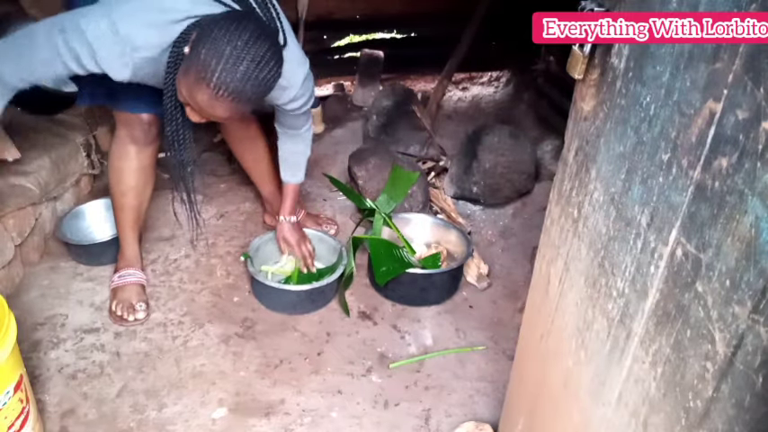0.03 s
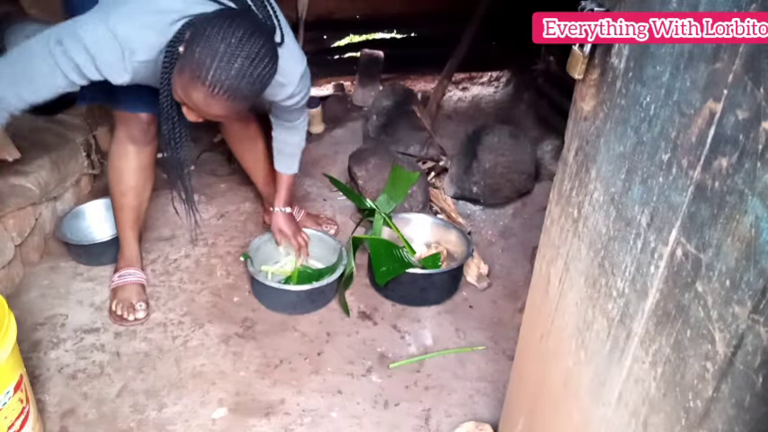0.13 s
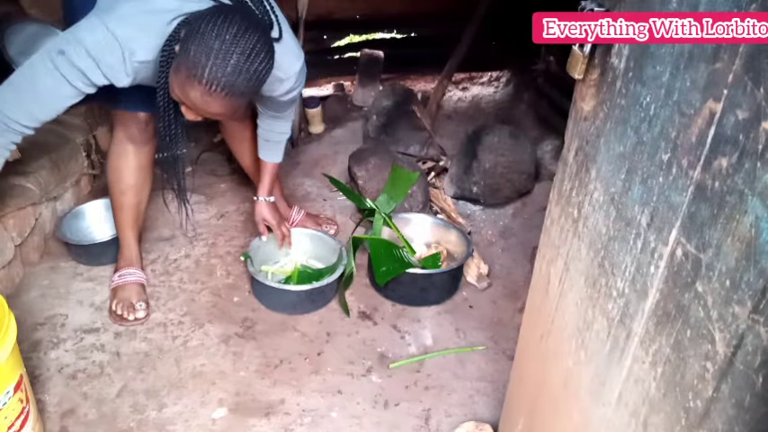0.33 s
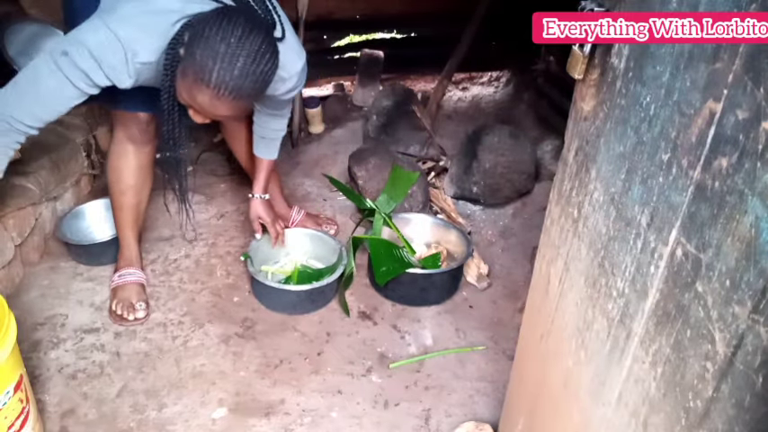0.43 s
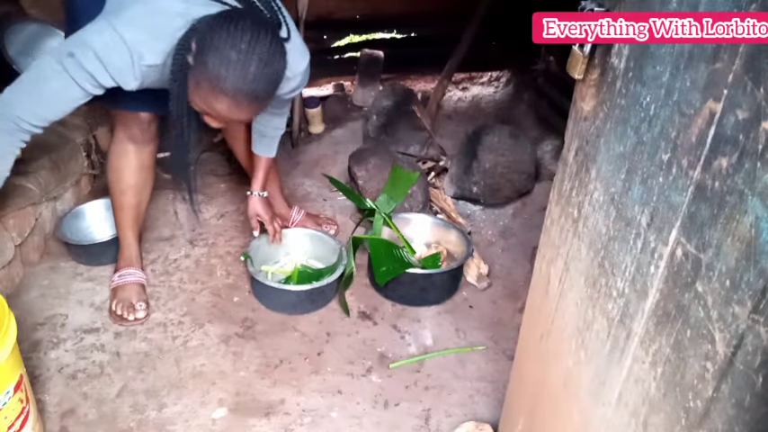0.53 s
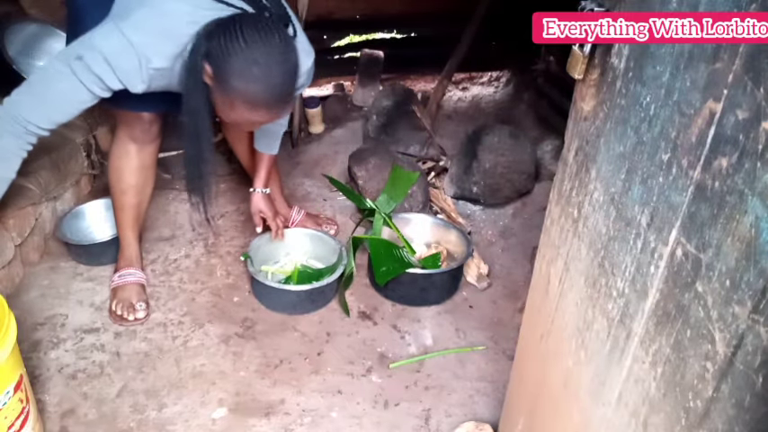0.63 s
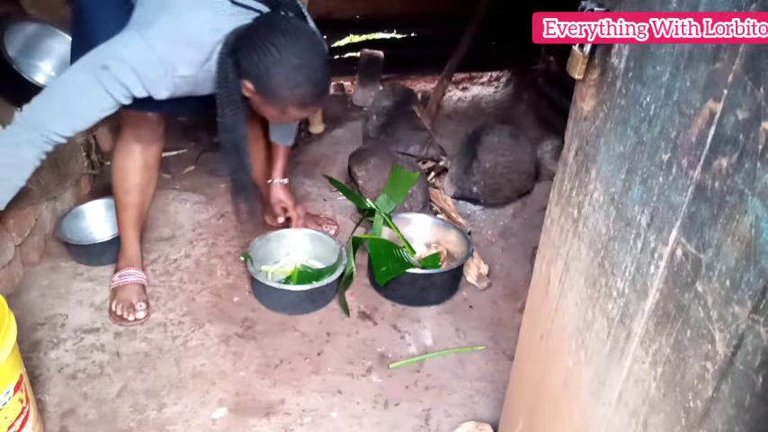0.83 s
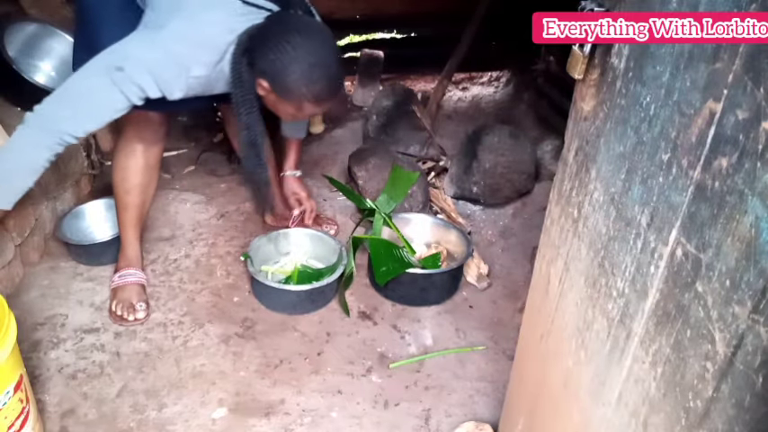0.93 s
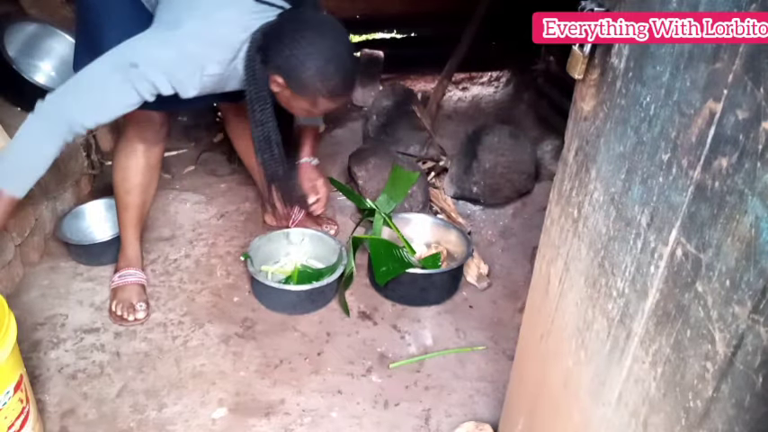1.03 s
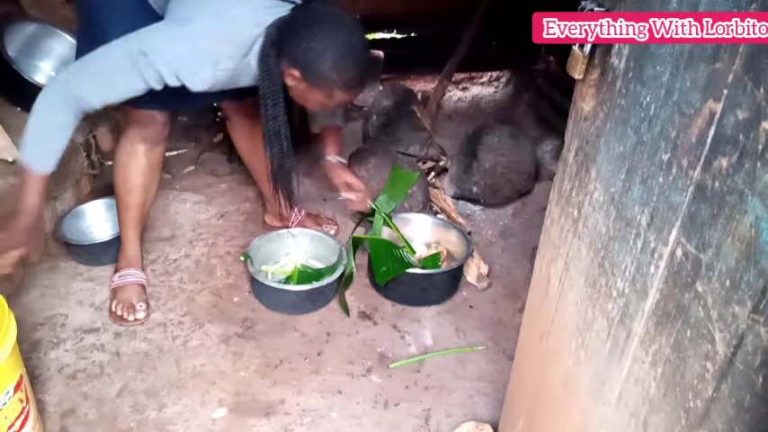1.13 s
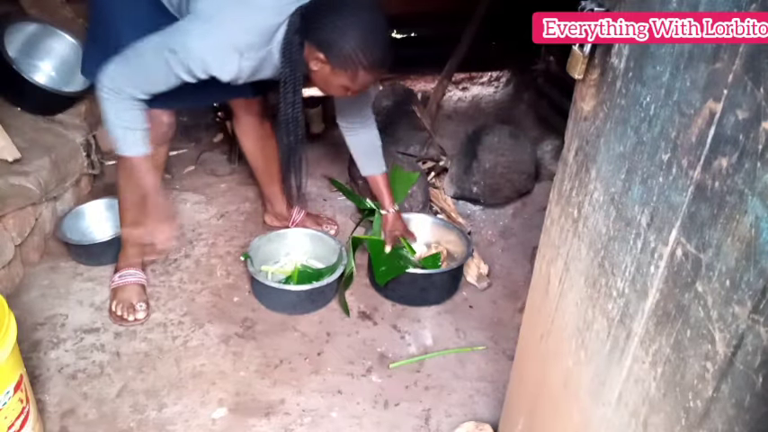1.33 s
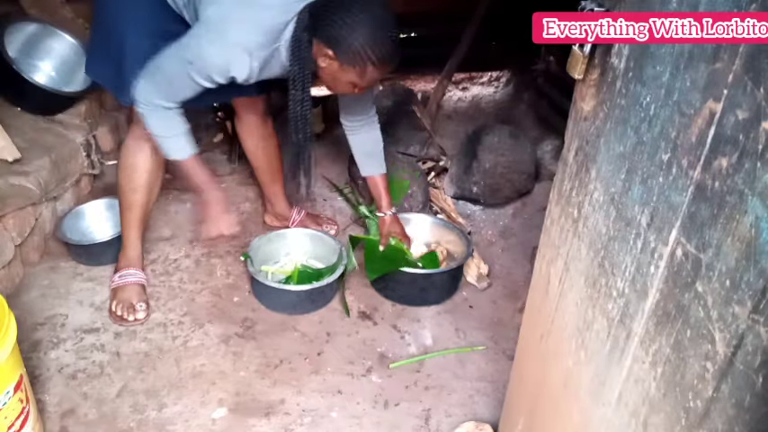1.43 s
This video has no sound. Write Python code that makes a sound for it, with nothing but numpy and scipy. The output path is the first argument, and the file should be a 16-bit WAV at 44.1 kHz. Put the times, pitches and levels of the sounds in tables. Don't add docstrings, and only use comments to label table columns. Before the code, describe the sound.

Hollow pot knocks on an earth floor, with faint scraping, then fresh leaves crackle and snap

```python
import sys
import numpy as np
from scipy import signal
from scipy.fft import rfft, irfft
from scipy.io import wavfile
from scipy.ndimage import uniform_filter1d, map_coordinates

SR = 44100
rng = np.random.default_rng(int(sys.argv[2]) if len(sys.argv) > 2 else 0)


def to_linear_factor(level_db):
    exponent = np.asarray(level_db, float) / 20
    return 10 ** exponent


def generate_wav(signal):
    frames = np.transpose(np.atleast_2d(signal))
    scaled = np.clip(frames, -1, 1) * 32767
    pcm = np.round(scaled).astype(np.int16)
    wavfile.write(sys.argv[1], SR, pcm)


N = 66150
T = np.arange(N) / SR


def unit(x):
    return x / np.sqrt(np.mean(x ** 2))


def noise(n=N):
    return rng.standard_normal(n)


def curve(rows):
    rows = np.array(rows, float)
    return to_linear_factor(np.interp(T, rows[:, 0], rows[:, 1]))


def colour(x, points):
    p = np.array(points, float)
    f = np.fft.rfftfreq(len(x), 1 / SR)
    gain = to_linear_factor(np.interp(np.log(f + 1), np.log(p[:, 0]), p[:, 1]))
    return irfft(rfft(x) * gain, len(x))


def band(x, hz, width_hz):
    return signal.lfilter(*signal.iirpeak(min(hz, .45 * SR), max(hz / width_hz, .3), SR), x)


def band_twice(x, hz, width_hz):
    return band(band(x, hz, width_hz), hz, width_hz)


def walk(rate_hz):
    k = int(SR / rate_hz)
    steps = np.repeat(noise(N // k + 1), k)
    return 2.1 * uniform_filter1d(uniform_filter1d(steps, k), k)[:N]


def fade(s, tau_s):
    return (T >= s) * np.exp(-np.maximum(T - s, 0) / tau_s)


def hollow_ring(modes, t):
    longest_t60_s, swell_s, swell_below_hz = .17, .011, 850
    wobble_db, wobble_rad = 2.5, .55
    ring = 0
    for k, (hz, db, t60) in enumerate(modes):
        level = to_linear_factor(db - 60 * t / min(t60, longest_t60_s) + wobble_db * walk(75.54)[:len(t)])
        tone = np.sin(2 * np.pi * hz * t + wobble_rad * walk(63)[:len(t)])
        swell = 1 - np.exp(-t / swell_s * max(hz / swell_below_hz, 1) ** 4)
        ring = ring + (-1) ** k * level * tone * swell
    return ring


def knocks():
    # t/s, body level/dB, crack over body/dB, contact cut-off f/Hz
    blows = [(0.2460, -33.5, 11, 12600), (.2790, -35, 2, 9220), (.3120, -56.5, 12, 6016),
             (.3230, -50, -18.5, 4000), (.3520, -51.5, 8, 8531), (0.3594, -39, -4.5, 2830),
             (0.5200, -42.5, -3.5, 1500), (0.757, -37, 0.5, 9005), (.7860, -46, -6.5, 3950),
             (.8030, -56.5, 2, 2963), (1, -54, -35, 984), (1.255, -60, -37, 983)]
    struck = [0, 0, 0, 0, 4, 4, 2, 1, 1, 1, 3, 3]
    # f/Hz, level/dB, t60/s
    bodies = [[(170.3, -10.5, 0.26), (302, -7.5, 0.1803), (360.23, -4.5, 0.2), (424.2, -1, 0.13),
               (537.4, -6.5, 0.11748), (652.5, -4, 0.15), (754, -1.5, 0.28), (819, 9, 0.13),
               (979, -6.5, 0.145), (1101, -7.5, 0.1334), (1310, -12, 0.1003), (1455.7, -5, 0.093),
               (1684, -10.5, 0.13), (1996.7, -10.5, 0.049)], [(332.97, -13, 0.16), (367, -8.5, 0.17), (412, -9, 0.14), (610, -29, .08),
                               (831.81, 2, 0.13), (891, -6, 0.12), (1026.2, -14, 0.098), (1117, -8, 0.068),
                               (1333, -5, 0.05563), (1451, -12.5, 0.094), (1637, -14, 0.05815),
                               (1824.4, -10.5, 0.05), (1930, -7.5, 0.046), (2517, -26, 0.07)], [(304.39, -11, 0.09687), (355, -3.5, 0.127),
                                               (408.84, -2.5, 0.12), (510, -13.5, 0.14), (800, 5.5, 0.053),
                                               (1065, -16, 0.14), (1287, -18.5, 0.11), (1500, -15, 0.06444)], [(807.3, 0, 0.094)], [(348.95, -12, 0.13067),
                                                                               (412, -5.5, 0.11),
                                                                               (750, -17, 0.195),
                                                                               (827, 8.5, 0.059),
                                                                               (935, 4.5, 0.074),
                                                                               (1008.4, -11, 0.0909),
                                                                               (1302, -12.5, 0.1756),
                                                                               (1539.2, -18.5, 0.0675),
                                                                               (2060, -15, 0.07714)]]
    # f/Hz, density/dB per Hz
    crack_colour = [(450, -22), (1100, 3.5), (2000, -4), (3300, -6), (4400, -9), (5800, -3.5), (8500, -11),
                    (12000, -24)]
    rattle_s, rattle_db = 0.0095, -8
    crack_s, crack_rise_s, all_cracks_db = 0.002, 0.0001459, -0.5
    body_send_db = -15

    t = T[:SR // 2]
    body_out, crack_out = np.zeros(N), np.zeros(N)
    for (s, db, crack_db, cut_hz), body in zip(blows, struck):
        ring = hollow_ring(bodies[body], t)
        push = noise(len(t)) * np.exp(-t / rattle_s)
        push *= to_linear_factor(rattle_db) / np.sqrt(np.sum(push ** 2))
        push[0] = 1
        crack = unit(colour(noise(len(t)), crack_colour))
        crack = crack * (np.exp(-t / crack_s) + 0.11 * np.exp(-t / rattle_s))
        crack = crack * (1 - np.exp(-t / crack_rise_s))
        crack = signal.lfilter(*signal.butter(1, min(cut_hz, .45 * SR), fs=SR), crack)
        i = int(s * SR)
        body_out[i:i + len(t)] += to_linear_factor(db) * signal.fftconvolve(push, ring)[:min(len(t), N - i)]
        crack_out[i:i + len(t)] += to_linear_factor(db + all_cracks_db + crack_db) * crack[:N - i]
    return body_out + crack_out + room(crack_out + to_linear_factor(body_send_db) * body_out)


def room(x):
    # f/Hz, t60/s
    hut_t60 = [(200, 0.322), (500, 0.18576), (900, 0.16), (3000, 0.17), (8000, 0.11), (15000, 0.11)]
    build_s, wet_db = 0.0075, 0.5
    t, r = T[:SR // 2], np.array(hut_t60)
    tail = 0
    for hz in 125 * 2. ** np.arange(8):
        t60 = np.interp(np.log(hz), np.log(r[:, 0]), r[:, 1])
        tail = tail + unit(band(noise(len(t)), hz, 0.84 * hz)) * np.sqrt(hz) * to_linear_factor(-60 * t / t60)
    tail = tail * (1 - np.exp(-t / build_s))
    return to_linear_factor(wet_db) * signal.fftconvolve(x, tail / np.sqrt(np.sum(tail ** 2)))[:N]


def gripped_leaves():
    # t/s, level/dB
    effort = [
        (1.33, -79.5),
        (1.364, -74),
        (1.378, -63.5),
        (1.396, -60.5),
        (1.424, -55.5),
        (1.486, -58),
        (1.5, -58),
    ]
    # f/Hz, density/dB per Hz
    leaf_colour = [(500, -7.5), (900, -6), (1400, -8.5), (2500, -1.5), (4000, -4.5), (5900, -3), (9000, -9),
                   (13000, -19)]
    crackles_per_s, crackle_spread_db = 700, 1.5
    swish_db, swish_flicker_db = 1, 3.3
    brighten = 1.8
    grip, crush = curve(effort), 0
    for hz in 500 * 2 ** np.arange(0, 5.1, .5):
        clicks = (rng.random(N) < crackles_per_s / SR) * to_linear_factor(crackle_spread_db * rng.exponential(size=N))
        clicks = clicks * rng.choice([-1, 1], N)
        swish = to_linear_factor(swish_db + swish_flicker_db * walk(45.15)) * noise()
        grain = band_twice(unit(clicks) + swish, hz, .5 * hz)
        crush = crush + grain * (grip / grip.max()) ** (brighten * hz / 16000)
    crush = colour(crush, leaf_colour)
    return crush / np.std(crush[-SR // 10:]) * grip * (T > effort[0][0])


def vein_snaps():
    # t/s, level/dB, centre f/Hz, fade/s
    snaps = [(1.375, -64, 3970, 0.00587), (1.39, -75, 15000, 0.055), (1.4067, -54.5, 2700, .003),
             (1.4187, -54.5, 2500, 0.003703), (1.4190, -52.5, 5840, .004), (1.4226, -54, 14900, 0.001273),
             (1.4270, -54, 6500, .003), (1.4365, -49.5, 5860, 0.0042), (1.4500, -50.5, 9000, .0008),
             (1.4560, -52, 14900, .0016), (1.4610, -66.5, 14900, .006), (1.4720, -64, 2455, 0.003935),
             (1.4800, -66, 4500, 0.00262)]
    out = np.zeros(N)
    for s, db, hz, tau_s in snaps:
        out += to_linear_factor(db) * fade(s, tau_s) * unit(band(noise(), hz, 0.12 * hz))
    return out


def leaf_touches():
    # t/s, level/dB, centre f/Hz, fade/s
    touches = [(0.06, -70, 4510, 0.043), (0.424, -72.5, 3990, 0.075), (0.481, -80.5, 7960, 0.033),
               (0.484, -81, 5130, 0.035), (0.536, -79, 5080, 0.02358), (0.831, -75, 3010, 0.036),
               (.86, -83, 5545, 0.05146), (0.951, -85, 2509, .07), (1.059, -85.5, 2938, 0.071),
               (1.09, -81, 4123, 0.0365), (1.15, -80.5, 5101, 0.032), (1.252, -79.5, 4298, 0.3035),
               (1.361, -73.5, 3981, 0.079), (1.37, -67.5, 1140, 0.064), (1.376, -74, 8727, 0.0581)]
    out = np.zeros(N)
    for s, db, hz, tau_s in touches:
        wisps = 0
        for ratio in np.exp(0.13 * noise(8)):
            wisps = wisps + to_linear_factor(3.3 * walk(37.04)) * band(noise(), hz * ratio, 0.033 * hz)
        out += to_linear_factor(db) * fade(s, tau_s) * unit(band(wisps, hz, .5 * hz))
    return out


def drag():
    # t/s, length/s, start f/Hz, end f/Hz, level/dB
    scrapes = [(0, .03, 420, 420, -73), (0, .03, 300, 300, -76), (0, .03, 1000, 980, -74),
               (0, .1, 1360, 1350, -77), (.06, .05, 900, 900, -76), (.06, .06, 430, 430, -77),
               (.06, .045, 1550, 1650, -76), (.07, .07, 2400, 2400, -77), (.05, .1, 7000, 6800, -73),
               (0, .06, 7250, 7200, -84), (.03, .04, 9100, 9000, -80), (.05, .16, 8700, 8300, -82),
               (.06, .045, 3300, 3250, -80), (.1, .13, 1170, 1130, -79), (.155, .09, 440, 420, -72),
               (.155, .04, 810, 800, -73), (.15, .09, 1620, 1830, -72), (.155, .09, 2400, 2330, -71),
               (.14, .1, 3700, 3650, -76), (.17, .07, 4400, 4300, -76), (.15, .025, 5300, 5300, -77),
               (.15, .09, 6700, 6400, -78), (.15, .04, 9050, 9000, -83), (.2, .04, 950, 950, -78),
               (.57, .05, 1020, 1100, -77), (.67, .07, 1130, 1200, -78), (.56, .06, 1300, 1260, -80),
               (.705, .02, 300, 290, -77), (1.07, .05, 430, 430, -80)]
    drag_db, flicker_db, edge_s = -1, 2, .018
    out = 0
    for s, length_s, hz, end_hz, db in scrapes:
        width_hz = .04 * hz + 30
        ring = unit(band_twice(noise(), hz, width_hz))
        glide = np.cumsum(np.interp(T, [s, s + length_s], [1, end_hz / hz]))
        ring = map_coordinates(ring, [glide], mode="mirror")
        gate = np.clip(np.minimum(T - s, s + length_s - T) / edge_s + 1, 0, 1) ** 2
        out = out + to_linear_factor(drag_db + db + flicker_db * walk(21.54)) * gate * ring
    return out


def yard():
    # f/Hz, width/Hz, level/dB
    rumble_bands = [(32.5, 30, -33.5), (71, 42, -4.5), (86, 37, -11), (131.29, 62.6, 4.5), (194, 93, -3)]
    # t/s, level/dB
    rumble_level = [(0, -71), (.2, -71), (.3, -69), (.45, -75), (.72, -74), (.9, -73), (.97, -77),
                    (1.1, -72), (1.2, -76), (1.3, -66), (1.35, -73), (1.5, -67)]
    # t/s, level/dB
    hum_level = [(0, -84), (.25, -77), (.45, -72.5), (.6, -77), (.7, -87.5), (.9, -86.5), (.97, -76.5),
                 (1.1, -83), (1.16, -74.5), (1.24, -76.5), (1.3, -73), (1.35, -76.5), (1.5, -70)]
    # f/Hz, density/dB per Hz
    hiss_colour = [(200, -10.5), (350, -4.5), (600, -9.5), (1100, -11), (2100, -12), (4000, -12.5),
                   (7000, -18.5), (12000, -23.5)]
    hum_hz, hum_width_hz, hum_flicker_db = 880, 260, 2
    rumble_flicker_db, hiss_db = 2.5, -78.5
    rumble = 0
    for hz, width_hz, db in rumble_bands:
        rumble = rumble + to_linear_factor(db + rumble_flicker_db * walk(10.85)) * unit(band_twice(noise(), hz, width_hz))
    hum = to_linear_factor(hum_flicker_db * walk(15.47)) * unit(band_twice(noise(), hum_hz, hum_width_hz))
    hiss = unit(colour(noise(), [(100, -34.5)] + list(hiss_colour)))
    return curve(rumble_level) * unit(rumble) + curve(hum_level) * hum + to_linear_factor(hiss_db) * hiss


def scene():
    leaves = gripped_leaves() + vein_snaps() + leaf_touches()
    return (knocks() + leaves + drag() + yard())[None]


def roll_off(x):
    return signal.sosfilt(signal.butter(12, 16750, fs=SR, output="sos"), x)


def record(dry):
    # f/Hz, level/dB
    port = [(13000, 0.5), (15000, 7.5)]
    heard = colour(dry[0], port)[None]
    low_pass = signal.ellip(8, .2, 70, 15750, fs=SR, output="sos")
    return roll_off(signal.sosfilt(low_pass, heard))


dry = scene()
out = record(dry)
generate_wav(out)
```